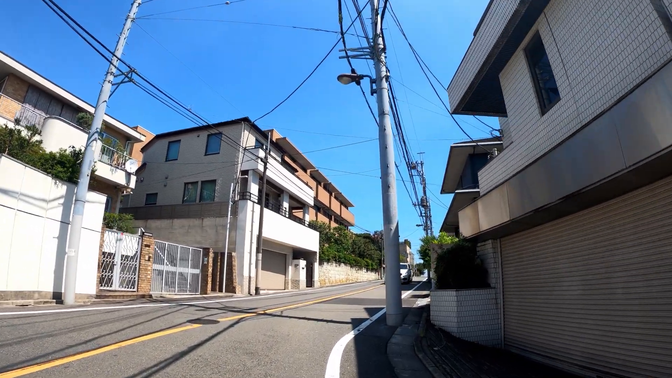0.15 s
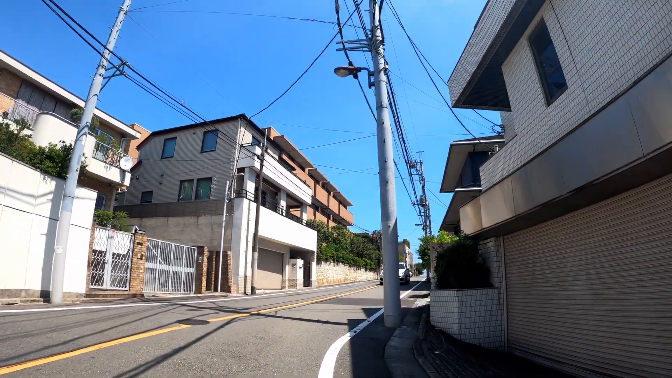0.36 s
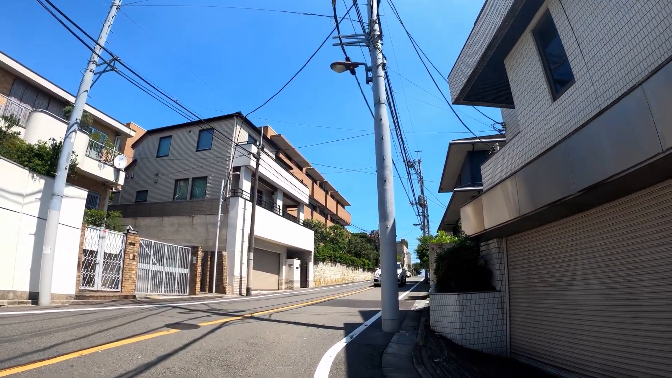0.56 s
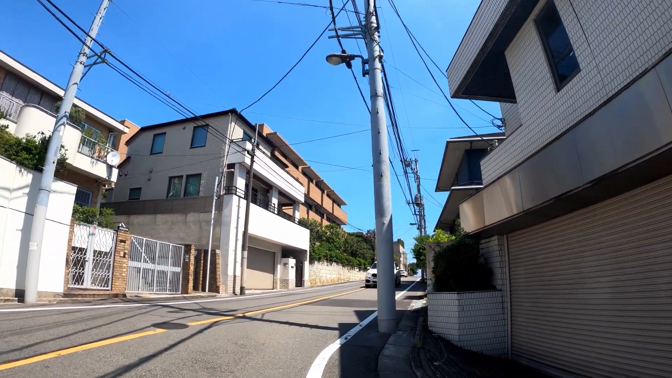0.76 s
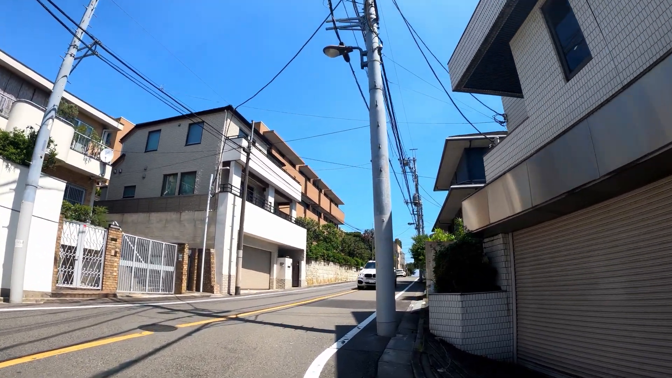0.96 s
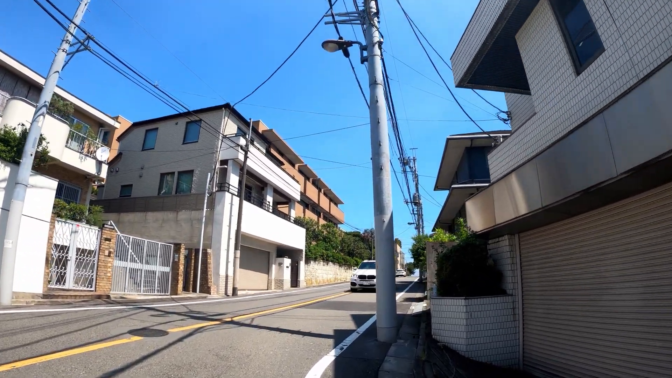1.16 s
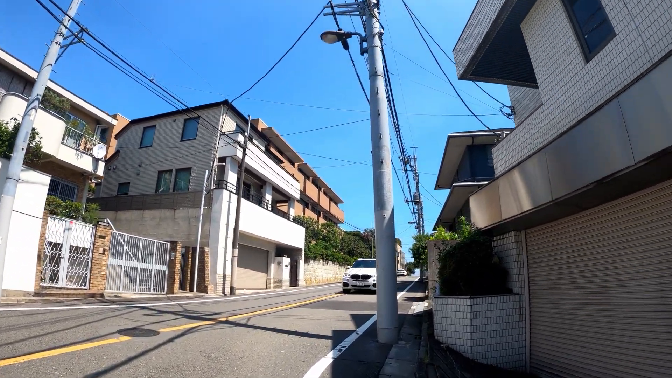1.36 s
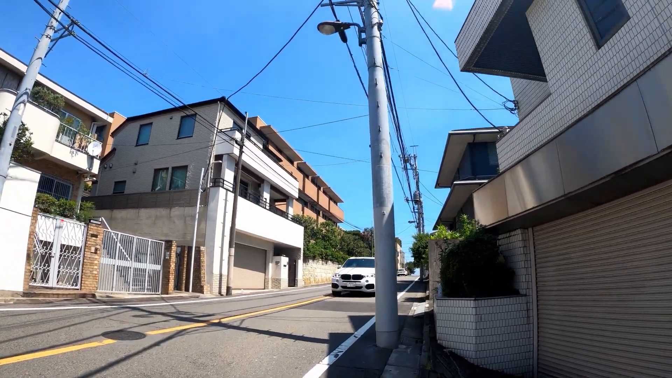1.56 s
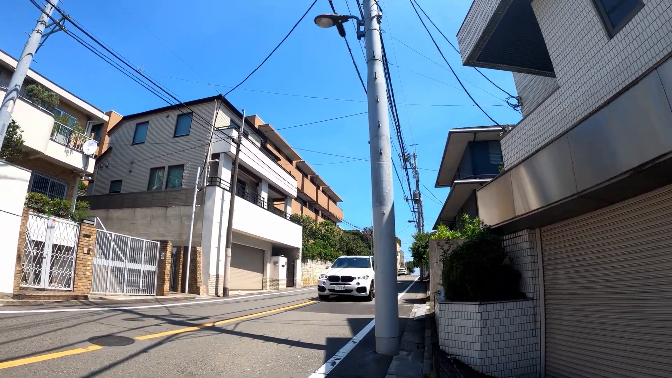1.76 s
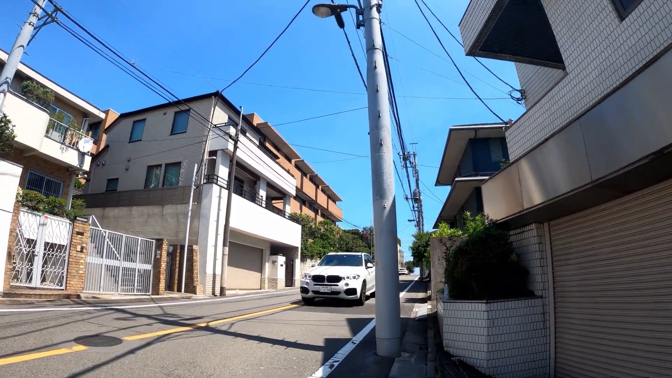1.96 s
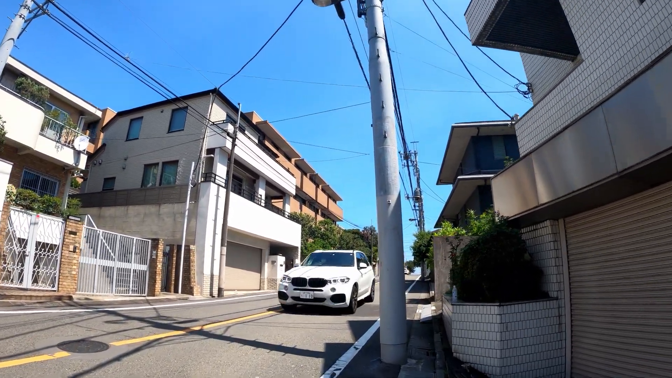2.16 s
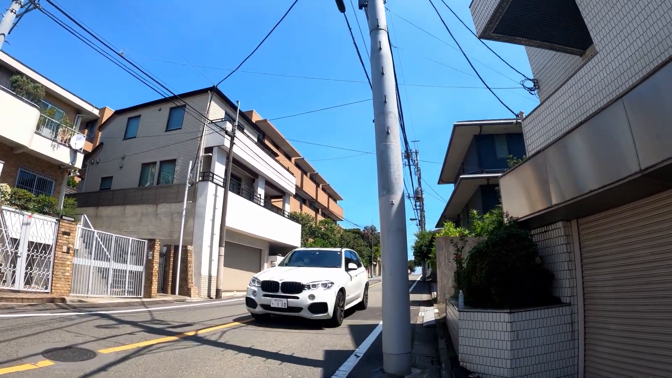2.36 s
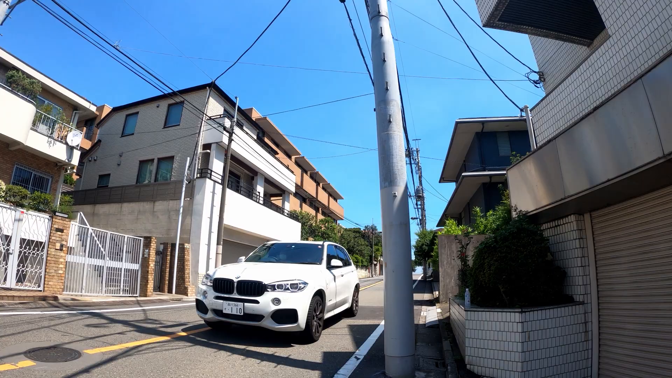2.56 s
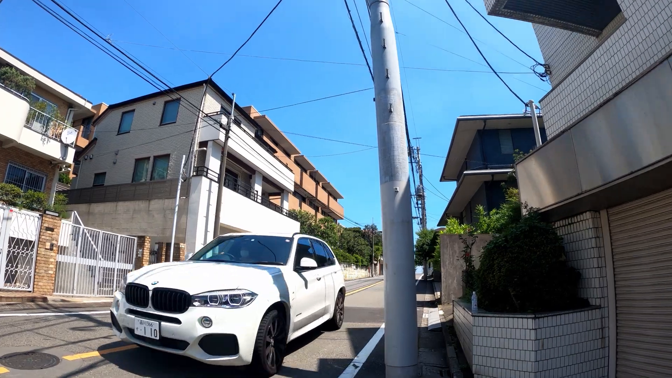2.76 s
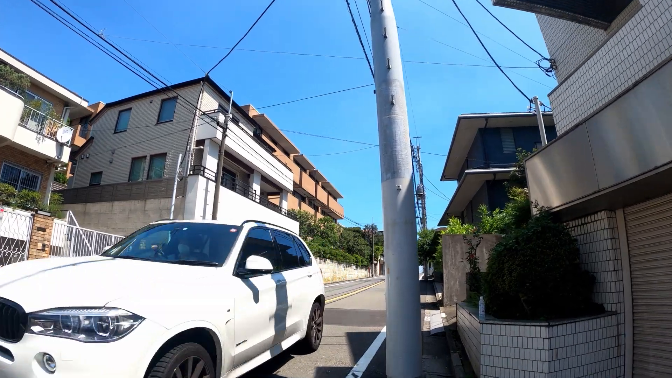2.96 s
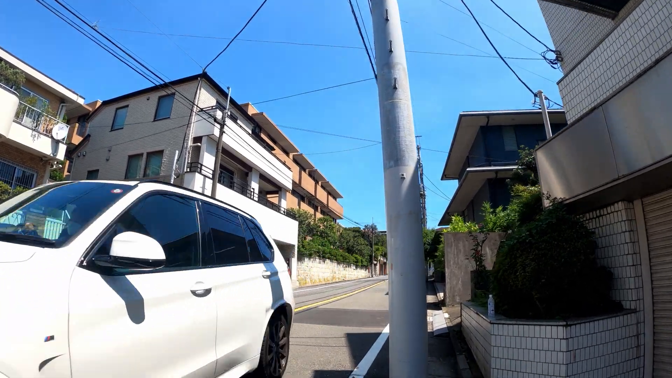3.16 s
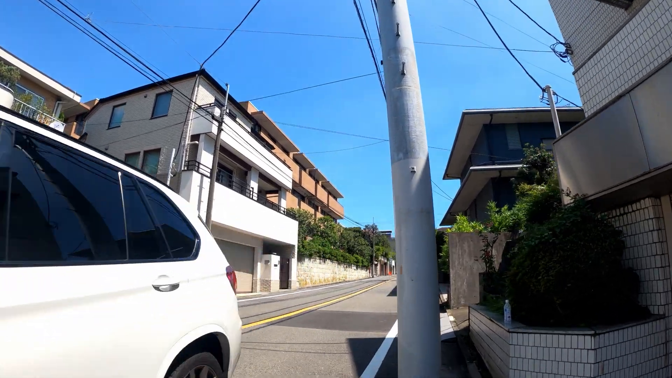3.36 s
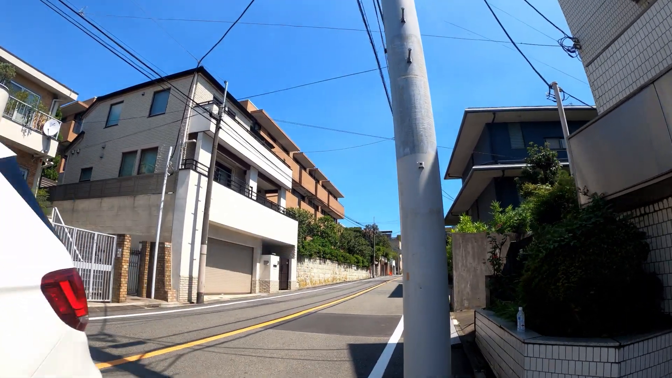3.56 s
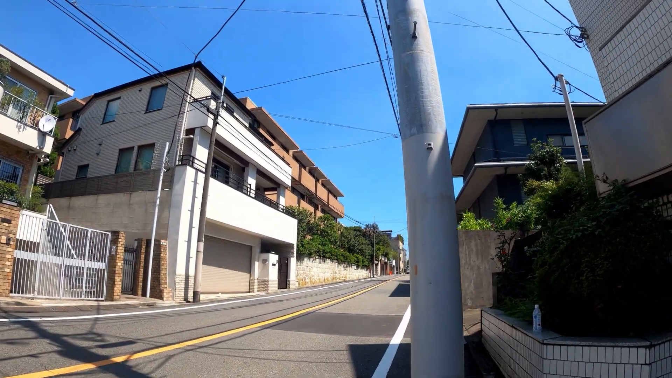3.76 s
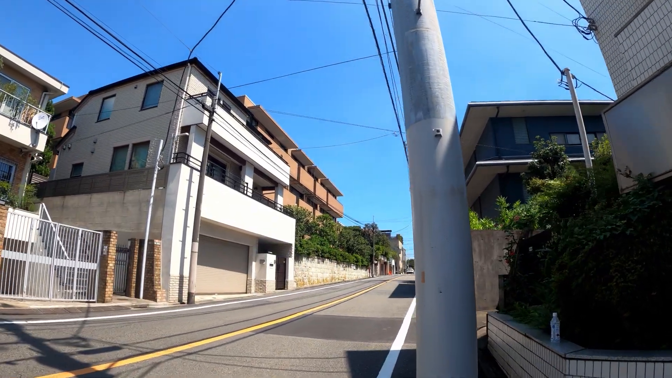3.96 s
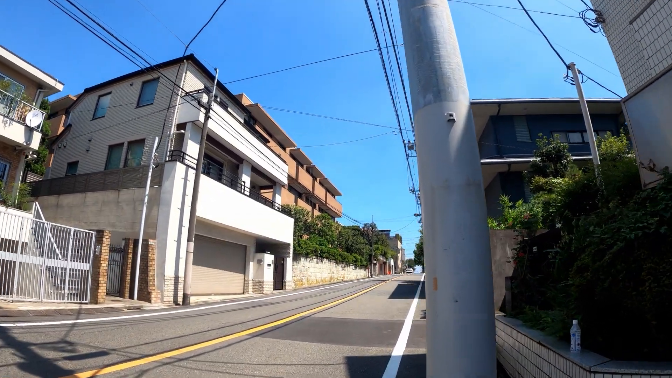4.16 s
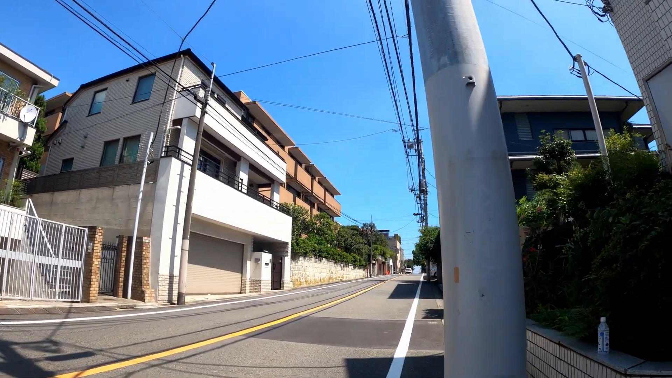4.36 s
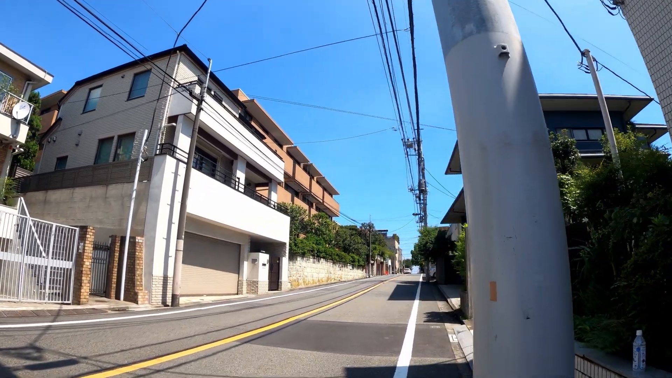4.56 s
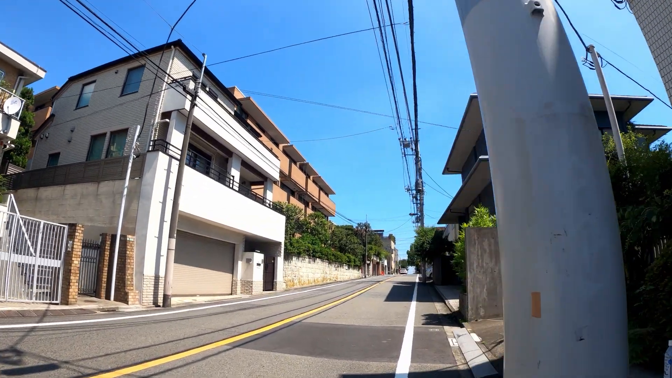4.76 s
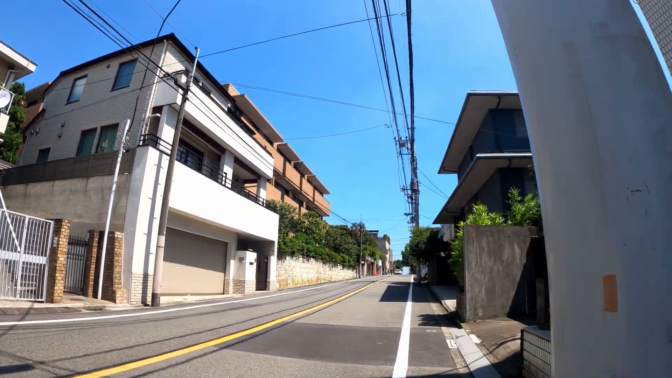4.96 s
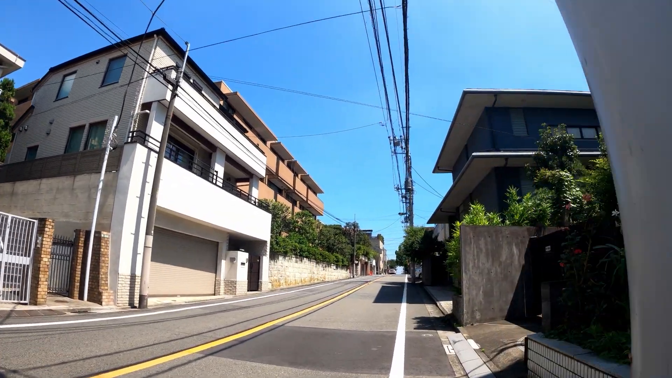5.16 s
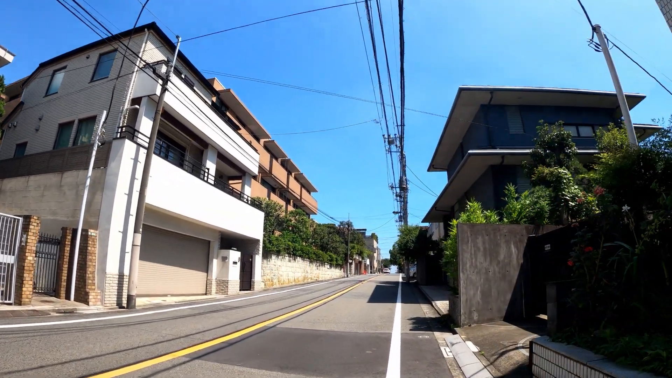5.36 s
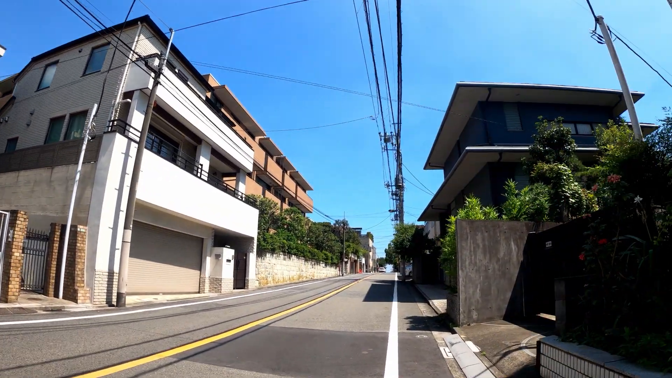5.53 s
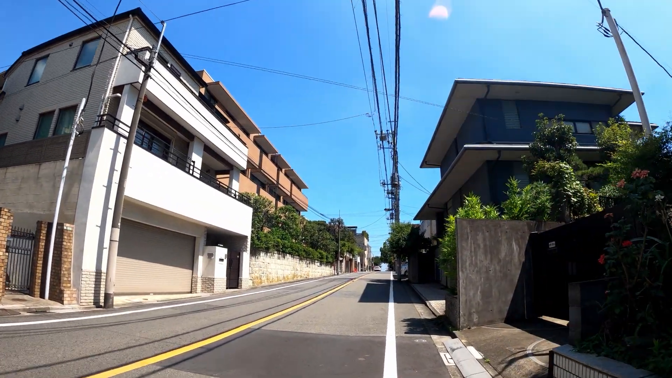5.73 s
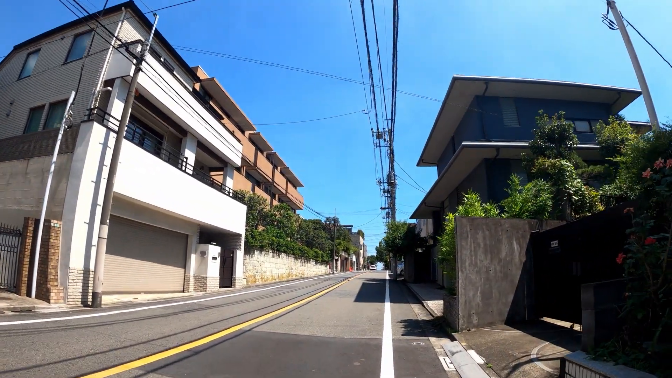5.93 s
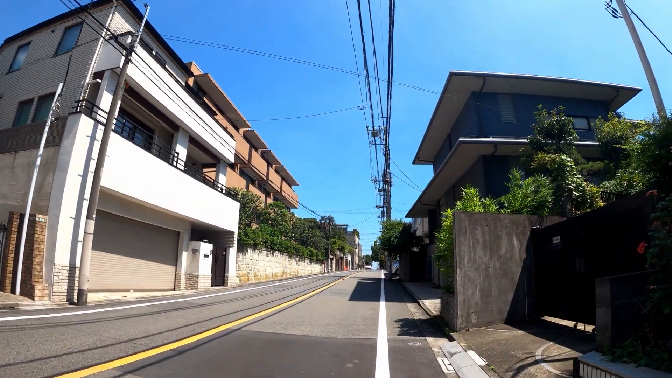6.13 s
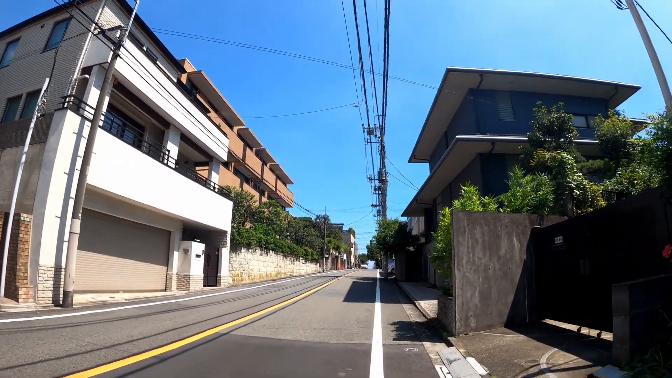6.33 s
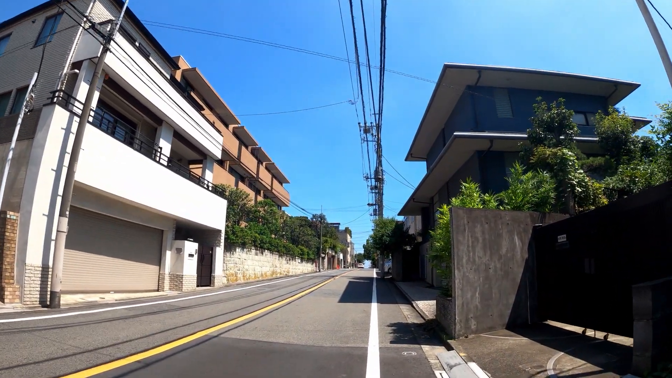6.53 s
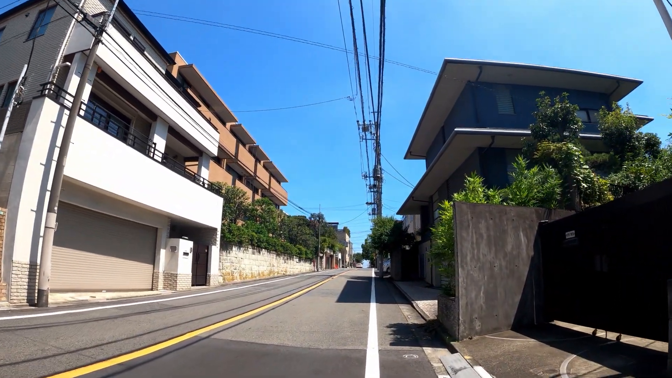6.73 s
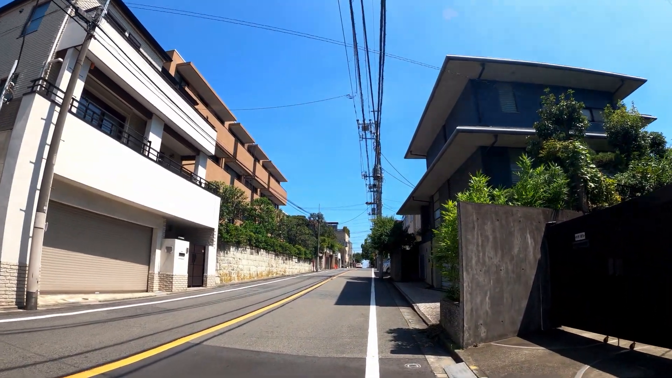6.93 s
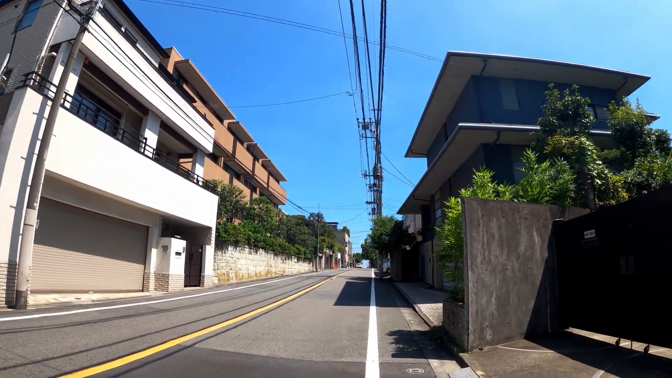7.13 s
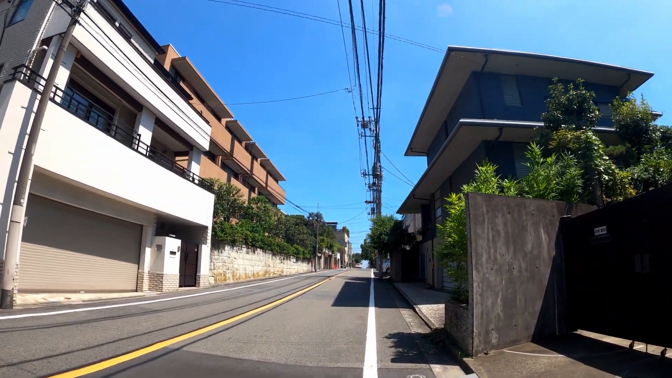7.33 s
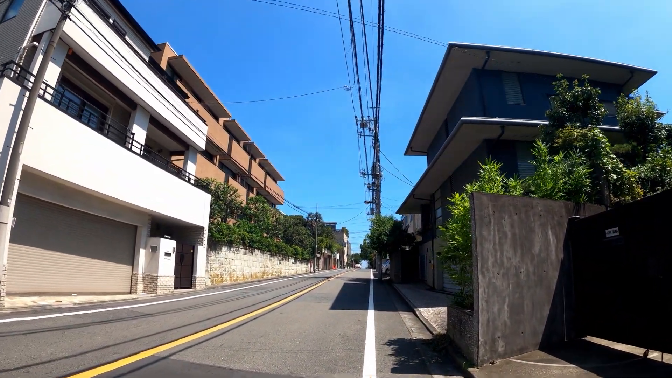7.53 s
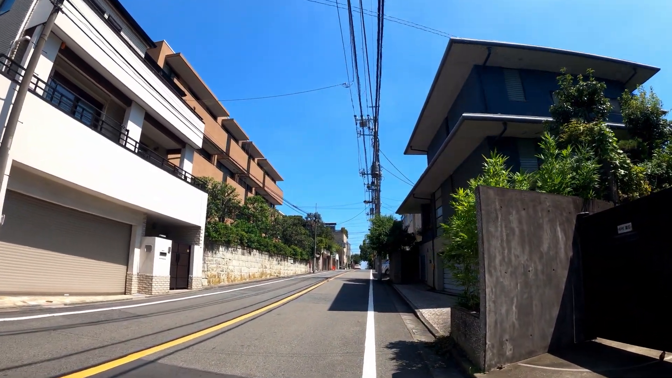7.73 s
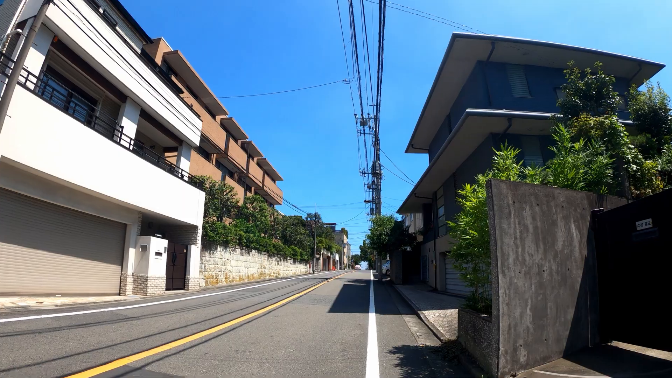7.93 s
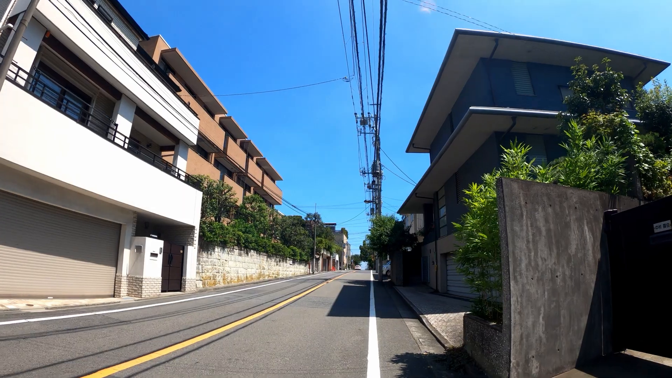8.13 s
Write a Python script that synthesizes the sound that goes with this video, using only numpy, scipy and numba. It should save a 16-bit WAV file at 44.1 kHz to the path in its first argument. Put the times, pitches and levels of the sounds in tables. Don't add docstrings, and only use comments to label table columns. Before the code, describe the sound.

A car's tyres roar up and past close by on a street, its engine droning away, then wind thumps the microphone and cicadas buzz on.

```python
import sys
import numpy as np
from scipy import signal
from scipy.fft import rfft, irfft, next_fast_len
from scipy.io import wavfile
from scipy.ndimage import uniform_filter1d
from numba import njit

SR = 44100
rng = np.random.default_rng(int(sys.argv[2]) if len(sys.argv) > 2 else 0)


def amplitude_ratio(level_db):
    exponent = np.asarray(level_db, float) / 20
    return 10 ** exponent


def dump(signal):
    limited = np.clip(np.atleast_2d(signal).T, -1, 1)
    pcm = np.round(limited * 32767).astype(np.int16)
    wavfile.write(sys.argv[1], SR, pcm)


N = 365588
T = np.arange(N) / SR
CONTROL_STEP = 64


def level(x, db):
    return x * amplitude_ratio(db) / np.sqrt(np.mean(x ** 2, axis=-1, keepdims=True))


def curves(table):
    s, *columns = np.transpose(table)
    return [np.interp(T, s, c) for c in columns]


def at(hz, table):
    f, v = np.transpose(table)
    return np.interp(np.log(hz + 1), np.log(f + 1), v)


@njit
def svf(x, hz, width):
    band, low, b, l = np.empty(len(x)), np.empty(len(x)), 0., 0.
    for i in range(len(x)):
        g, k = np.pi * hz[i] / SR, width / hz[i] if width else 1.4
        g = g + g * g * g / 3 + 2 * g ** 5 / 15 + 17 * g ** 7 / 315
        v = (b + g * (x[i] - l)) / (1 + g * (g + k))
        band[i], low[i] = k * v, l + g * v
        b, l = 2 * v - b, l + 2 * g * v
    return band, low


def ring(x, hz, width):
    hz = hz * np.ones(N)
    once = svf(x, hz, 1. * width)[0]
    return svf(once, hz, 1. * width)[0]


def noise_ring(hz, width):
    return ring(rng.standard_normal(N), hz, width)


def walk(rate):
    k = int(SR / rate)
    held = np.repeat(rng.standard_normal(N // k + 1), k)
    return 1.3 * uniform_filter1d(uniform_filter1d(held, k), k)[:N]


def bands(lo_hz, hi_hz, db_at):
    out = np.zeros((2, N))
    for hz in lo_hz * 2 ** np.arange(0, np.log2(hi_hz / lo_hz), 1 / 3):
        edges = hz * 2 ** (-1 / 6), min(hz * 2 ** (1 / 6), .45 * SR)
        sos = signal.butter(2, edges, "band", fs=SR, output="sos")
        noise = signal.sosfilt(sos, rng.standard_normal((2, N)))
        out += level(noise, 10 * np.log10(edges[1] - edges[0])) * amplitude_ratio(db_at(hz))
    return out


def steady(x, hold_s):
    k = int(hold_s * SR)
    return x / np.sqrt(uniform_filter1d(uniform_filter1d(x ** 2, k), k) + 1e-18)


def swells(table):
    rise_share = 0.76
    s, db, fall_s = np.transpose(table)[:3, :, None]
    late = (np.arange(0, N, CONTROL_STEP) / SR - s) / np.maximum(fall_s, .01)
    return amplitude_ratio(2 * (db - 10 * np.maximum(late, -late / rise_share)))


def spread(x):
    return np.interp(np.arange(N), np.arange(0, N, CONTROL_STEP), x)


PASSES_S = 3.05
# time in seconds, level in dB.
NEARNESS = [(0.0, -38), (0.97, -35.5), (1.15, -36.5), (1.78, -34), (2.25, -33.5), (2.45, -31), (2.65, -30),
            (3.03, -27.5), (3.5, -31.5), (3.85, -36.5), (4.69, -38.5), (5.3, -40.5), (5.61, -43.5),
            (5.95, -48), (6.4, -53.5), (6.83, -54.5), (7.15, -59), (8.29, -62.5)]
# level in dB at the reference, slope in dB per dB of nearness,
# change in dB from behind, street floor in dB.
CAR_LAYERS = [
    (-32, 1.06, -1, -54.5),
    (-30, 1.0269, -0.57, -67.5),
    (-48, 0.76, 7, -71),
    (-72.5, 2.5, 5, -82),
    (-44, 1.5, -12, -81),
]


def car_db():
    reference_db, turn_s = -30, 0.032
    above = curves(NEARNESS)[0] - reference_db
    behind = .5 + .5 * np.tanh((T - PASSES_S) / turn_s)
    rows = []
    for db, slope, tail_db, floor_db in CAR_LAYERS:
        car_power = amplitude_ratio(2 * (db + slope * above + tail_db * behind))
        rows.append(10 * np.log10(car_power + amplitude_ratio(2 * floor_db)))
    return np.array(rows)


# lower edge in Hz, upper edge in Hz.
ROAR_PARTS = [(300, 700), (800, 1500), (1900, 2900), (9000, 10500)]
# frequency in Hz, level in dB per Hz.
TREAD_SPECTRUM = [(140, -31), (240, -5.5), (322, -7), (396, -1), (432, -23), (463, -8), (532, -8.5),
                  (975, -6.5), (1530, -14.5), (2240, -26.5), (3890, -32.5), (4870, -34), (6540, -40.5),
                  (9400, -46), (15000, -70)]
# frequency in Hz, level in dB per Hz.
RUMBLE_SPECTRUM = [(22, -11.5), (40, -6.5), (70, -6), (110, -11.5), (170, -9), (260, -8.5), (330, -30)]
# frequency in Hz, width in Hz, level in dB under the middle roar.
TREAD_PIPES = [(465, 47, -11), (949, 148, -9.5)]


def tyres():
    middles = np.log([480, 1250, 2000, 3100, 9000])
    shares = np.eye(4)[:, [0, 1, 2, 2, 3]]
    sums = [10 * np.log10(np.sum(amplitude_ratio(2 * at(np.arange(*part), TREAD_SPECTRUM)))) for part in ROAR_PARTS]
    layer_db = car_db()[:-1]
    gains = layer_db - np.array(sums)[:, None]
    swell = 0.5 * walk(4.91)

    def roar_db(hz):
        weights = [np.interp(np.log(hz), middles, row) for row in shares]
        return at(hz, TREAD_SPECTRUM) + weights @ gains + swell + 0.8 * walk(14)

    def rumble_db(hz):
        return at(hz, RUMBLE_SPECTRUM) + 5.7 * walk(3.95)

    roar = bands(291.4, 16000, roar_db)
    rumble = level(bands(24.97, 280, rumble_db), 6) * amplitude_ratio(layer_db[0])
    pipes = sum(level(noise_ring(hz, width), db) for hz, width, db in TREAD_PIPES) * amplitude_ratio(layer_db[1])
    sizzle = level(np.array([noise_ring(9400, 1600) for _ in range(2)]), 0) * amplitude_ratio(layer_db[3])
    return roar + pipes + sizzle + rumble


# time in seconds, frequency in Hz.
CAVITY_PITCH = [(0, 220.2), (1.5, 216.3), (2.2, 211), (2.6, 199.4), (3.2, 204), (3.8, 204.2), (8.29, 193)]
# peak in seconds, level in dB, time to fall 10 dB in seconds.
TYRE_BUMPS = [(0.27, -34.5, 0.3), (0.55, -23.5, 0), (0.85, -28.5, 0.5), (1.25, -35, 0.5), (1.53, -22, 0.46),
              (1.92, -20, 0.1), (2.2, -18, 0.19), (2.46, -19.5, 0.1), (2.7, -33, 0.4), (2.9, -24, 0.35),
              (3.09, -23.5, 0.11), (3.32, -18.5, -0.24), (3.82, -23.5, 0.1), (4.1, -32, 0.1),
              (4.54, -23.5, 0.1), (4.87, -31.5, -0.9), (5.2, -31.5, 1), (5.95, -37.5, 0.84)]
# peak in seconds, level in dB, time to fall 10 dB in seconds.
SHELL_BUMPS = [(0.15, -38, 0.5), (0.48, -29.5, 0.2), (1.0, -35, 0.5), (1.71, -29, 0.04), (2.2, -30, 0),
               (2.53, -24, 0), (2.72, -18, -0.13), (2.89, -19, 0.27), (3.2, -24, -0.37), (3.53, -21, 0.17),
               (3.75, -16, -0.06), (3.92, -28.5, 0.5), (4.19, -24.5, 0.45), (4.45, -23, 0.36),
               (4.64, -15.5, -0.26), (4.88, -22, 0.22), (5.08, -24.5, 0.16), (5.5, -35, 1),
               (5.95, -39, -0.7)]
# time in seconds, level in dB.
FAR_IDLE = [(0, -34), (1.7, -39.5), (2.1, -50), (4.1, -43), (4.5, -42.5), (6, -31), (6.6, -39.5),
            (8.29, -45)]


def hum():
    tail = amplitude_ratio(2 * (-43.5 - 2.5 * (T - PASSES_S)))
    cavity_hz = curves(CAVITY_PITCH)[0] * (1 + .006 * walk(6))
    cavity = steady(noise_ring(cavity_hz, 14), 0.06)
    boom = steady(noise_ring(157 * (1 + .02 * walk(5)), 20), 0.06)
    idle = steady(noise_ring(40.6, 6.7), .2)
    cavity_size, boom_size = [np.sqrt(spread(swells(bumps).sum(axis=0)) + tail)
                              for bumps in (TYRE_BUMPS, SHELL_BUMPS)]
    return amplitude_ratio(-1.5) * cavity_size * cavity + amplitude_ratio(-3.0) * boom_size * boom + amplitude_ratio(curves(FAR_IDLE)[0]) * idle


# time in seconds, firing rate in Hz, level of the first order in dB.
ENGINE_RUN = [(0.0, 73.1, -39.5), (0.45, 71.96, -42), (1.9, 70, -41.5), (2.44, 67.64, -32.5),
              (3.0, 63.6, -25), (3.3, 59.26, -18), (3.6, 56.1, -23.5), (3.84, 55.7, -36),
              (4.2, 59.9, -28.5), (4.33, 64.04, -33.5), (4.46, 70, -43), (4.6, 75.5, -28),
              (4.85, 79.43, -26), (5.12, 79.4, -26.5), (5.25, 77.3, -42), (5.38, 64.87, -38.5),
              (5.6, 64.87, -29.5), (6.05, 63.67, -37)]
# frequency in Hz, level in dB against the first order.
EXHAUST_COLOUR = [(110, -19), (123, -18), (131, -3), (144, -3.5), (156, -9), (225, -20), (258, -20.5),
                  (320, -22)]


def engine():
    hz, first_db = curves(ENGINE_RUN)
    second_db = first_db + at(2 * hz, EXHAUST_COLOUR)
    fourth_db = first_db + at(4 * hz, EXHAUST_COLOUR)
    phase = 2 * np.pi * np.cumsum(hz * (1 + 0.0053 * walk(9))) / SR
    fade = np.clip((ENGINE_RUN[-1][0] - T) / 0.15, 0, 1)
    orders = amplitude_ratio(first_db + 1.2 * walk(7)) * np.sin(phase)
    orders += amplitude_ratio(second_db + 3.36 * walk(5.18)) * np.sin(2 * phase)
    orders += amplitude_ratio(fourth_db + 0.5 + 2.56 * walk(25)) * np.sin(4 * phase)
    halves = amplitude_ratio(-14 + 3 * walk(6)) * np.sin(phase / 2)
    halves += amplitude_ratio(-24 + 3 * walk(6)) * np.sin(3 * phase / 2)
    return np.sqrt(2) * fade * (orders + amplitude_ratio(first_db) * halves)


def grille():
    hiss = np.array([noise_ring(3720, 2100) for _ in range(2)])
    return level(hiss, -4.5) * amplitude_ratio(car_db()[-1] + .8 * walk(9.2))


# start in seconds, length in seconds, frequency in Hz, width in Hz, level in dB.
SHORT_HISSES = [(1.397, .05, 8800, 500, -63), (3.05, 0.34, 2400, 1400, -49), (5.218, 0.12, 1900, 1600, -40),
                (5.305, 0.11, 2000, 1200, -39.5), (5.328, 0.046, 3200, 400, -52),
                (5.416, 0.066, 2670, 450, -45), (5.468, .12, 2400, 1200, -48),
                (7.315, 0.064, 410, 52, -42.5), (2.3, 0.71, 3930, 700, -51.5), (4.7, 1.28, 259, 89, -41),
                (5.546, 0.31, 129.4, 6.2, -35.5), (3.03, .3, 4600, 2000, -53), (7.47, 0.071, 650, 400, -51)]


def puffs():
    out = np.zeros(N)
    for s, length_s, hz, width, db in SHORT_HISSES:
        burst = np.sin(np.pi * np.clip((T - s) / length_s, 0, 1))
        out += burst * level(noise_ring(hz, width), db) * amplitude_ratio(1.7 * walk(40))
    return out


# time in seconds, chorus level in dB, share of the near singer from 0 to 1.
CICADA_SONG = [(0, -52, 0.12), (1.5, -52, 0.15), (2.6, -54, .1), (3.4, -57, .05), (4.7, -52, 0.06),
               (5.5, -51.5, 0.13), (5.9, -48.5, 0.22), (6.2, -51.5, 0.44), (6.5, -55, 0.02),
               (6.9, -51, 0.2), (7.3, -50.5, 0.38), (7.55, -49, 0.34), (7.8, -48.5, 0.5), (8.29, -51, 0.3)]
# frequency in Hz, width in Hz, level in dB.
CHORUS_BANDS = [(5260, 1200, 5), (6130, 1440, 5), (7130, 1600, -6)]
# frequency in Hz, width in Hz, level in dB.
SINGER_BANDS = [(4850, 400, -8), (5230, 400, -5), (5590, 420, 0), (5960, 420, 0), (6340, 400, -7)]


def plate_clicks(hits):
    jitter, force = rng.standard_normal((N // 100, 2))[:len(hits)].T
    clicks = np.zeros(N)
    places = np.clip(hits + np.round(.9 * jitter).astype(int), 0, N - 1)
    clicks[places] = amplitude_ratio(2.5 * force)
    lags = rng.integers(30, 400, 3)
    return clicks + sum(gain * np.roll(clicks, lag) for gain, lag in zip((.25, .2, .15), lags))


def cicadas():
    buzz_hz, throb_hz, throb_peak_s = 372.4, 15.75, 7.497
    chorus_db, near = curves(CICADA_SONG)
    near = np.clip(near, 0, .95)
    upper_db = -27.5 + 1.5 * T + 0.55 * dull_db()
    top_db = -31.5 + 2 * T + dull_db() - .3 * (chorus_db - CICADA_SONG[0][1])
    turn = 2 * np.pi * throb_hz
    throb, upper_throb = [.5 + .5 * np.cos(turn * (T - throb_peak_s + lead_s)) for lead_s in (0, .028)]
    rise = np.sin(turn * (T - throb_peak_s + 0.024))
    beat = (.16 + throb ** 1.3) * amplitude_ratio(.8 * walk(14))
    cycle = np.cumsum(buzz_hz * (1 + .0025 * walk(30))) / SR
    hits = np.flatnonzero(np.diff(cycle // 1))
    out = []
    for _ in range(2):
        clicks = plate_clicks(hits)
        air = rng.standard_normal(N) * amplitude_ratio(0.93 * walk(6.1))
        far, song = np.zeros(N), np.zeros(N)
        for k, (hz, width, db) in enumerate(CHORUS_BANDS):
            far += amplitude_ratio(db) * ring(np.roll(air, SR * (k + 1)), hz, width)
        for k, (hz, width, db) in enumerate(SINGER_BANDS):
            song += (-1) ** k * amplitude_ratio(db + 2 * walk(25)) * ring(clicks, hz, width)
        far, song = level(far, 0), level(beat * song, 0)
        far_up = level(ring(air, 7960, 1800), 0)
        song_up = level(upper_throb ** 1.8 * ring(clicks, 8150 + 350 * rise, 1100), 2.5)
        top = level(ring(air, 11900, 3000), -3)
        top += near * level(beat * ring(clicks, 12100, 1500), -2)
        top += level(ring(np.roll(air, SR), 14500, 4500), -12)
        mix = np.sqrt(1 - near) * (far + amplitude_ratio(upper_db) * far_up)
        mix += np.sqrt(near) * (song + amplitude_ratio(upper_db) * song_up)
        out.append(amplitude_ratio(chorus_db) * (mix + amplitude_ratio(top_db) * top))
    return np.array(out)


# peak in seconds, level in dB, time to fall 10 dB in seconds, edge in Hz.
GUSTS = [(0.05, -44, -3, 68.6), (0.95, -30.5, 0.3, 82.7), (1.38, -26.5, 0.3, 72), (1.75, -15, 0.08, 90),
         (2.1, -17, 0.19, 105), (2.36, -34, 0.5, 79.5), (2.78, -24, -0.5, 80.3), (2.91, -22.5, -0.1, 70.2),
         (3.14, -21, -1.8, 98), (3.5, -20, -0.45, 122.5), (3.75, -25.5, 0.76, 123), (3.97, -36, -1, 72),
         (4.38, -40, 0, 90), (5.36, -33, 0.5, 199), (5.58, -28.5, 0.6, 80), (5.92, -18.5, 0.06, 88.4),
         (6.08, -13, 0.04, 95), (6.135, -12.5, 0.0368, 200), (6.18, -15.5, 0.02, 169.5),
         (6.299, -19, 0.11, 88.5), (6.45, -27, -0.06, 132), (6.599, -20.5, -0.18, 106.6),
         (6.88, -32.5, 0.1, 125), (7.136, -19.5, 0, 140), (7.22, -20, 0.1, 111), (7.29, -25, 0.02, 140),
         (7.39, -30, 0.07, 79.5), (7.66, -36, 0.8, 115), (8.0, -29, -0.1, 111.4), (8.17, -38, 0, 190)]


def gusts():
    calm_db, shared = -61, .12
    power = swells(GUSTS) + amplitude_ratio(2 * calm_db) / len(GUSTS)
    total = power.sum(axis=0)
    gust_db = spread(10 * np.log10(total))
    edge_hz = spread(np.transpose(GUSTS)[-1] @ power / total)
    high_pass = signal.butter(3, 38, "high", fs=SR, output="sos")
    out = []
    for _ in range(2):
        x = rng.standard_normal(N)
        for _ in range(2):
            x = svf(x, 1.306 * edge_hz, 0.)[1]
        x = signal.sosfilt(high_pass, x)
        out.append(steady(x, 0.05) * amplitude_ratio(gust_db - 3.5 + 3.24 * walk(50)))
    out = np.array(out)
    return (out + shared * out[::-1]) / np.hypot(1, shared)


# start in seconds, peak in dB, frequency in Hz,
# left minus right in dB.
PORT_SLAPS = [(1.76, -18, 229, -1), (2.099, -21.5, 233, -1.0), (2.197, -26, 180, -14),
              (2.887, -32, 231, -4.5), (3.5, -18, 234.3, 2), (3.759, -22, 237.4, 2),
              (5.968, -24, 230.3, 0.5), (6.052, -17, 150, 2), (6.068, -13, 260, 1), (6.072, -17, 398, 1),
              (6.077, -15, 216, 10), (6.091, -12.5, 240, 1), (6.094, -18, 170, -10),
              (6.101, -16.5, 316, -3), (6.104, -18, 330, 5), (6.11, -17, 363, 2), (6.112, -16, 195, -6),
              (6.124, -10.5, 253, -3), (6.129, -16, 330, 2), (6.137, -19, 180, 3), (6.142, -17.5, 190, -3),
              (6.148, -17.5, 256, 3), (6.163, -18.5, 267, 2), (6.174, -17, 200, -8), (6.18, -20, 170, -1),
              (6.188, -21, 275, -1), (6.205, -22, 160, 0), (6.29, -29, 269, 0), (6.319, -25.5, 231, 11),
              (6.456, -23, 228, 10), (6.569, -27, 200, 9), (7.113, -24.5, 157, 10), (7.13, -22, 149, -5),
              (7.146, -27, 170, 0), (7.165, -29, 150, 0), (7.186, -18.5, 149, 2), (7.2, -18, 202, 3),
              (7.226, -19.5, 221, 2), (7.272, -24, 170, 0), (7.299, -30, 200, 0), (7.484, -33, 252, -7)]


def slaps():
    out = np.zeros((2, N))
    phases = rng.uniform(0, 2 * np.pi, (len(PORT_SLAPS), 2))
    for (s, db, hz, pan_db), phase in zip(PORT_SLAPS, phases):
        cycles = np.arange(int(4 * SR / hz)) * hz / SR
        crack = min(0.47 * amplitude_ratio(1.1 * (db + 14.0)), .8)
        phase = phase if s < 6.8 else phase[[0, 0]]
        phase = phase[:, None]
        shape = 4.4 * (cycles / 0.34) ** 2 * np.exp(-cycles / 0.32)
        swing = np.sin(2 * np.pi * cycles + phase)
        swing = swing + crack * np.sin(1.86 * 2 * np.pi * cycles + 3 * phase)
        pan = np.array([[pan_db], [-pan_db]]) / 2
        start = int(s * SR)
        out[:, start:start + len(cycles)] += shape * swing * amplitude_ratio(db - 6.5 + pan)
    return out


# frequency in Hz, likeness in power from 0 to 1.
PORT_LIKENESS = [(60, 0.71), (130, 0.92), (290, 0.99), (640, 0.88), (1410, 0.76), (3100, 0.34),
                 (6820, 0.057), (15000, 0.23)]
# frequency in Hz, left minus right in dB.
PORT_TILT = [(60, 0), (110, -0.5), (200, -1), (380, -0.5), (700, -3.5), (1290, -4), (2380, -4.5),
             (4400, -0.5), (8120, -1), (15000, -1)]
# frequency in Hz, phase in radians.
PORT_LEAD = [(0, -0.5), (950, 0.15), (2000, 1.5), (3000, 1), (5000, 0.3), (6700, 3.5), (16000, 5.5)]


def ports(sound, other):
    size = next_fast_len(N)
    hz = np.arange(size // 2 + 1) * SR / size
    like_power = np.where(hz < 300, .985, at(hz, PORT_LIKENESS))
    like = np.sqrt(np.clip(like_power, 0, 1))
    left = rfft(sound, size)
    right = like * left * np.exp(-1j * at(hz, PORT_LEAD)) + np.sqrt(1 - like ** 2) * rfft(other, size)
    tilt = amplitude_ratio(at(hz, PORT_TILT) / 2)
    return irfft(np.array([left * tilt, right / tilt]), size)[:, :N]


def dull_db():
    start_s, length_s, depth_db = 6.2, 0.53, -7
    return depth_db * np.sin(np.pi * np.clip((T - start_s) / length_s, 0, 1))


def fold(stereo):
    fold_s, fold_db_per_s, mono_s = 6.16, -21, 7.4
    mid, side = (stereo[0] + stereo[1]) / 2, (stereo[0] - stereo[1]) / 2
    side = side * amplitude_ratio(fold_db_per_s * np.maximum(T - fold_s, 0)) * (T < mono_s)
    return mid + side * np.array([[1], [-1]])


def top_hiss():
    sos = signal.butter(4, (11400, 14600), "band", fs=SR, output="sos")
    hiss = signal.sosfilt(sos, rng.standard_normal((2, N)))
    return level(hiss, -76) * amplitude_ratio(dull_db())


def scene():
    brief = puffs()
    air = tyres() + grille() + cicadas() + np.array([brief, brief])
    return ports(air[0] + engine() + hum(), air[1]) + gusts() + slaps()


def low_pass(x):
    return signal.sosfilt(signal.butter(12, 15640, fs=SR, output="sos"), x)


def record(dry):
    limit = 0.8
    dry = limit * np.tanh(dry / limit)
    mix = fold(dry) + top_hiss()
    return low_pass(mix)


dry = scene()
out = record(dry)
dump(out)
```